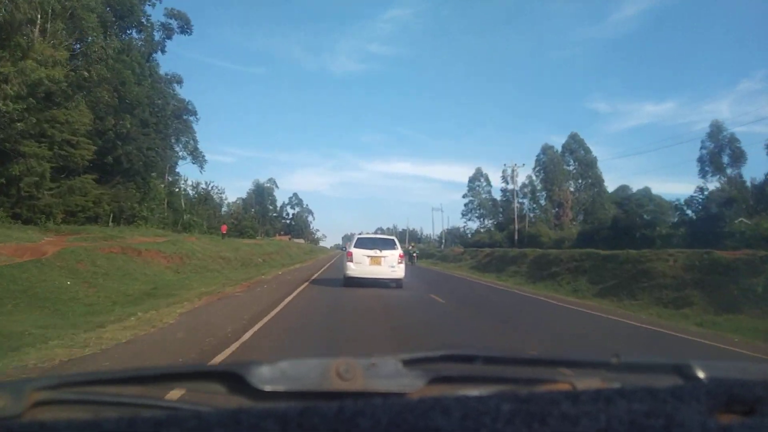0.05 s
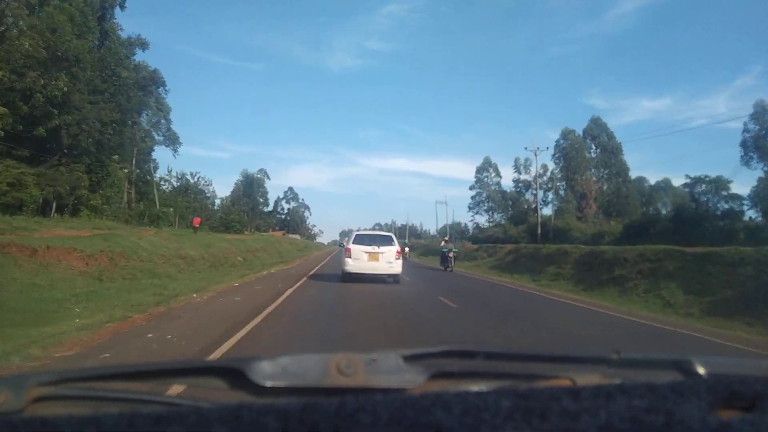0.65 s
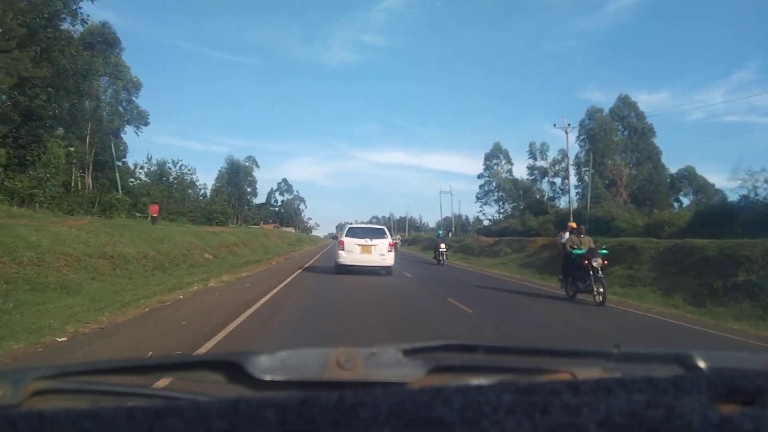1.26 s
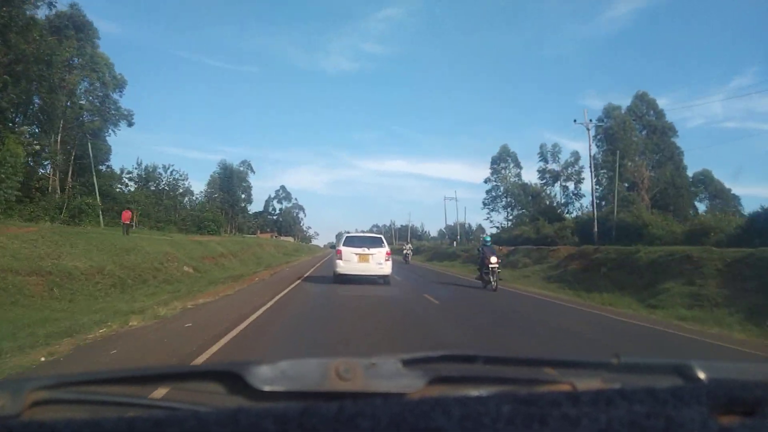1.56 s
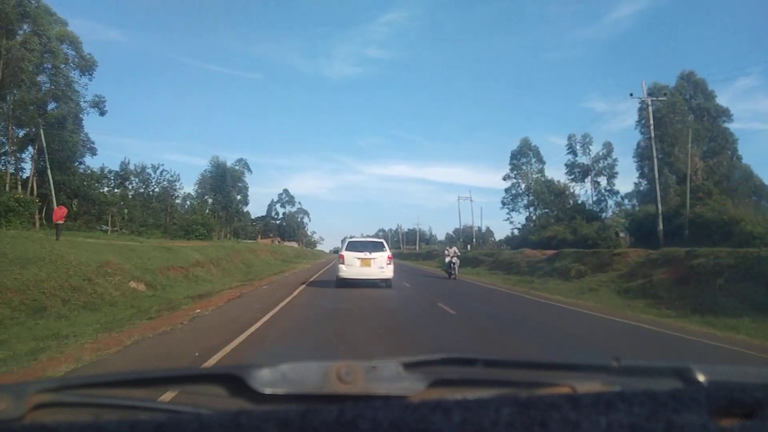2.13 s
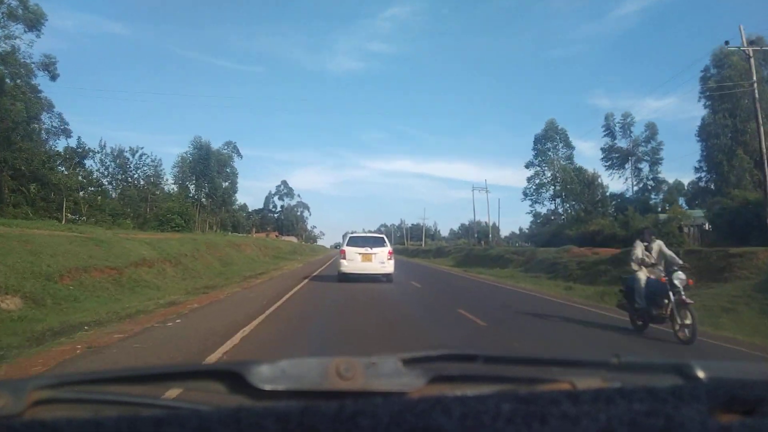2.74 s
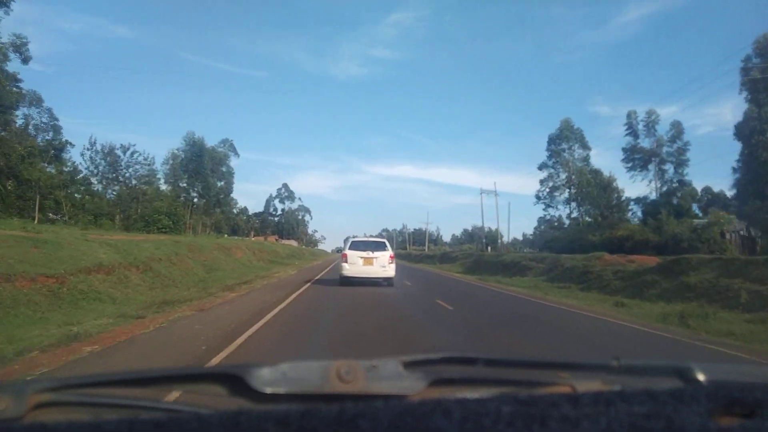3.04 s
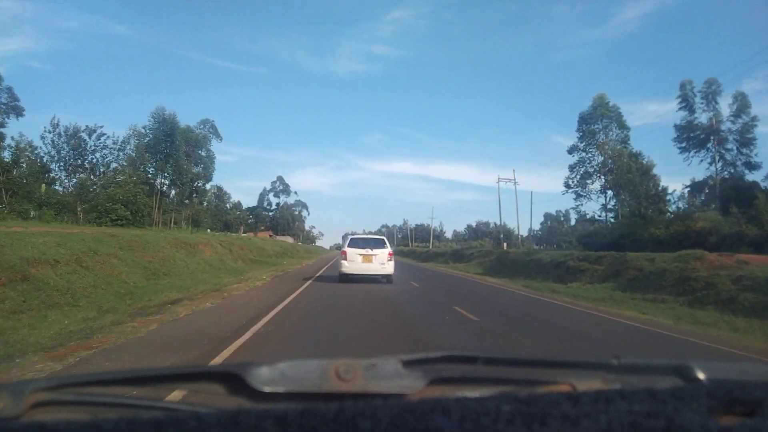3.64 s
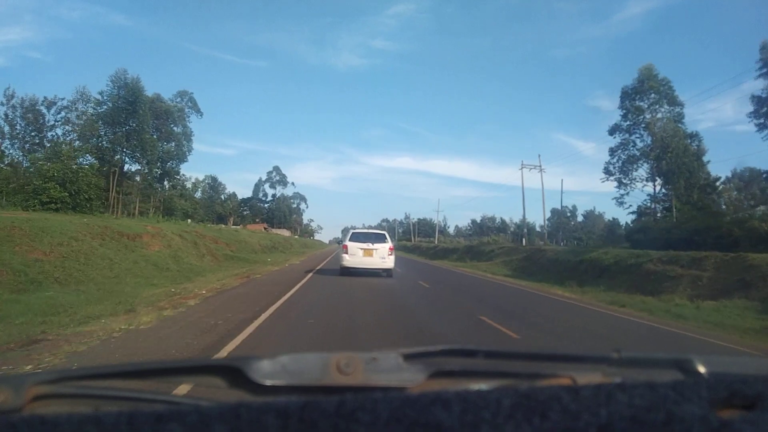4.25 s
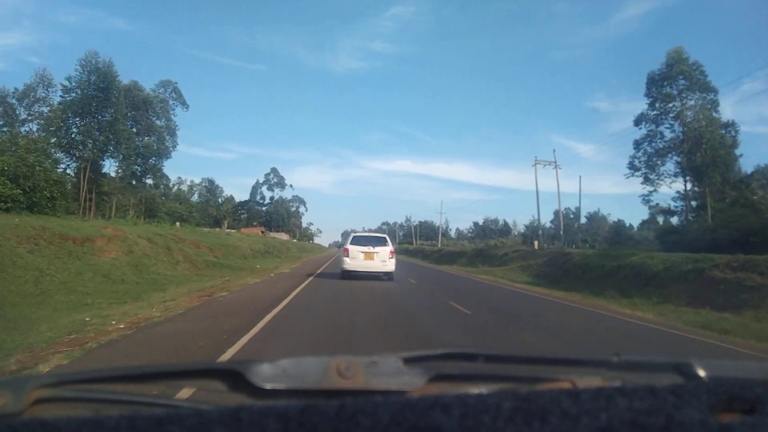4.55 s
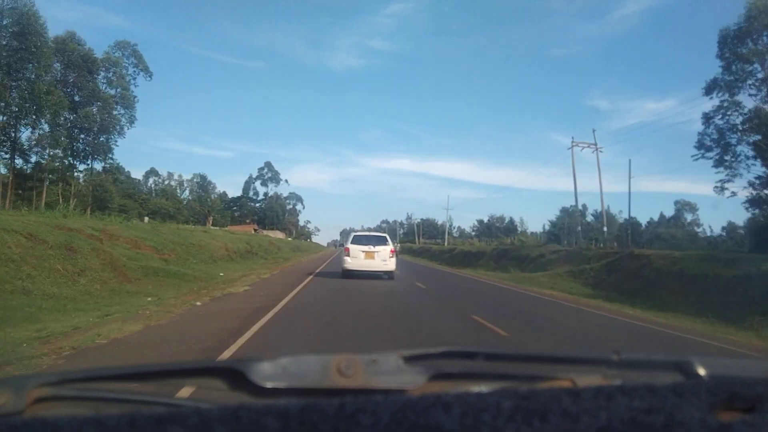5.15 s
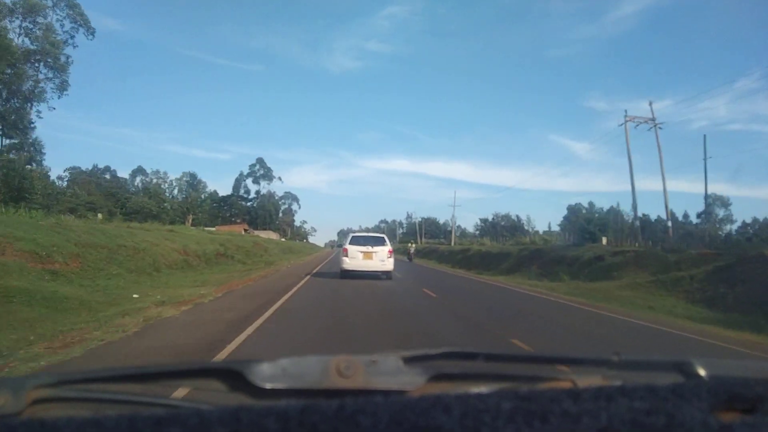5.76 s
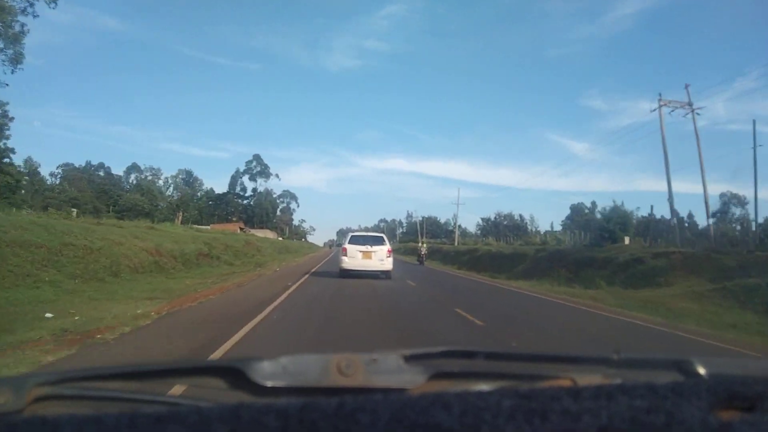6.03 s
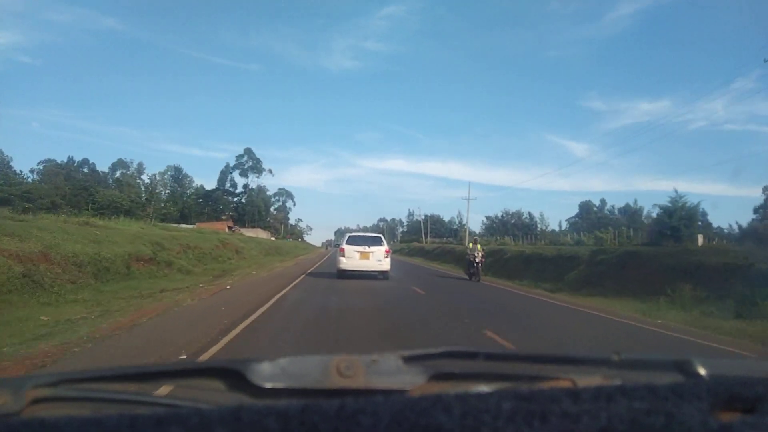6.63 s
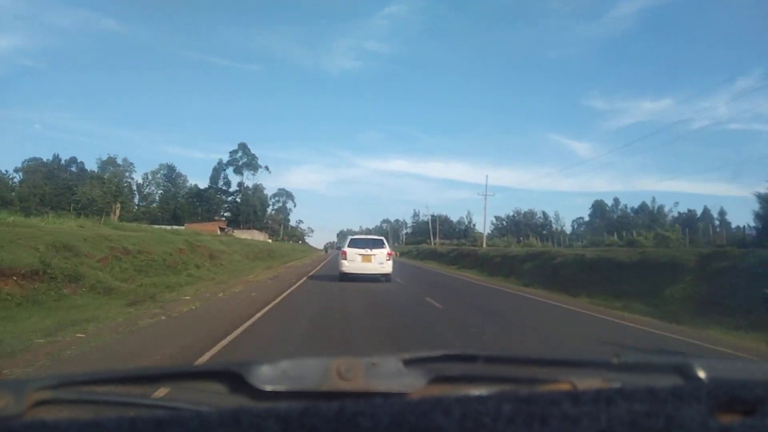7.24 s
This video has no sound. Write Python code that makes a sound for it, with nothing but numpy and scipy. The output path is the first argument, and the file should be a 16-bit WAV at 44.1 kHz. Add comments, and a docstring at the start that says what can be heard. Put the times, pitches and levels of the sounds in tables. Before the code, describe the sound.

Inside a car, tyres rumble over a humming engine while loose trim ticks and knocks and three vehicles pass the other way.

```python
"""Inside a car on coarse tarmac, very slowly gaining speed; a phone microphone behind the windscreen.
All around, the tyres shake the body and ring the panels, over a steady rush of air.
The four-cylinder engine hums beneath; close by, loose dashboard trim ticks, knocks and rasps.
Three oncoming vehicles swish past the window, dull as they approach and bright when alongside."""
import sys
import numpy as np
from scipy import signal
from scipy.fft import rfft, irfft, next_fast_len
from scipy.io import wavfile
from scipy.ndimage import uniform_filter1d

SR = 44100
rng = np.random.default_rng(int(sys.argv[2]) if len(sys.argv) > 2 else 0)


def persist_wave(psi):
    """Save psi, clipped to +-1, as 16-bit WAV."""
    counts = np.round(np.clip(psi, -1, 1) * 32767).astype(np.int16)
    wavfile.write(sys.argv[1], SR, np.atleast_2d(counts).T)


N = 325899
TIME = np.arange(N) / SR


def undb(db):
    """Decibels to gain."""
    return 10 ** (np.asarray(db) / 20)


def unit(x):
    """Scale to rms 1."""
    return x / np.sqrt(np.mean(x ** 2))


def walk(rate):
    """Smooth random drift of rms 1, changing about rate times a second."""
    size = int(SR / rate)
    held = rng.standard_normal(4096)[np.arange(N) // size]
    return unit(uniform_filter1d(uniform_filter1d(held, size), size))


def swell(s, half_s):
    """A bell-shaped rise and fall of height 1 around one moment."""
    return np.exp(-.5 * ((TIME - s) / half_s) ** 2)


def colour(x, spectrum):
    """Shape x by (f/Hz, level/dB) points and scale to rms 1."""
    hz, db = np.transpose(spectrum)
    size = next_fast_len(N)
    bins = np.maximum(np.fft.rfftfreq(size, 1 / SR), 1)
    gain = undb(np.interp(np.log(bins), np.log(hz), db))
    return unit(irfft(rfft(x, size) * gain, size)[:N])


def noise(spectrum):
    """Coloured noise of rms 1."""
    return colour(rng.standard_normal(N), spectrum)


def resonate(x, hz, width):
    """One resonance, gain 1 at its centre."""
    return signal.lfilter(*signal.iirpeak(hz, hz / width, fs=SR), x)


def band(x, hz, width):
    """A resonance applied twice for steep sides, scaled to rms 1."""
    return unit(resonate(resonate(x, hz, width), hz, width))


def ring(modes, contact_hz=11000):
    """One blow on (f/Hz, t60/s, level/dB) modes, peak 1; the finite contact time softens the top."""
    t = TIME[:SR // 20]
    y = sum(undb(db) * np.exp(-np.log(1000) * t / t60) * np.sin(2 * np.pi * hz * t)
            for hz, t60, db in modes)
    y = signal.sosfilt(signal.butter(2, contact_hz, fs=SR, output="sos"), y)
    return y / np.abs(y).max()


def blows(rows):
    """An impulse for each (t/s, level/dB) row."""
    x = np.zeros(N)
    for s, db in rows:
        x[int(s * SR)] += undb(db)
    return x


def sparks(per_s, scatter_db):
    """Impulses at random moments with scattered sizes."""
    return (rng.random(N) < per_s / SR) * undb(scatter_db * np.clip(rng.standard_normal(N), -2, 2))


def crackle(start_db=-87, db_per_s=-2.4):
    """Far in the background, loose bits in the cabin snap brightly, less as the road gets smoother."""
    snaps = band(sparks(per_s=30, scatter_db=5), hz=11200, width=8000)
    return snaps * undb(start_db + db_per_s * TIME)


# Seal chirps, barely reaching the microphone: t/s, peak level/dB, f/Hz
SEAL_CHIRPS = [(2.182, -55, 3800), (5.77, -60, 3690), (5.973, -70, 3690)]

def squeaks(half_s=0.0082, waver=0.004):
    """A seal chirps as the body flexes: a nearly pure tone that swells and fades."""
    wavering_time = np.cumsum(1 + waver * walk(50)) / SR
    return sum(undb(db) * swell(s, half_s) * np.sin(2 * np.pi * hz * wavering_time)
               for s, db, hz in SEAL_CHIRPS)


# Modes of the plastic trim: f/Hz, t60/s, relative level/dB
TRIM_MODES = [(4130, 0.0042, 2), (5230, 0.0021, 12), (5700, 0.0031, -1.5), (6700, 0.0016, -12),
              (10400, 0.0017, -1)]
# Its louder rasps, close to the microphone: t/s, level/dB, half duration/s
TRIM_RASPS = [(0.005, -47, 0.0075), (0.048, -57, 0.011), (0.133, -58, .004), (0.174, -58, .004),
              (0.234, -61, .005), (0.45, -63, 0.0044), (0.49, -60, 0.01), (0.743, -61, 0.018),
              (0.868, -62, 0.0047), (0.938, -62, 0.0064), (1.01, -63, .003), (1.058, -61, .004),
              (1.18, -63, .006), (1.218, -59, 0.0056), (1.355, -61, .004), (1.428, -59, .005),
              (1.571, -57, .004), (1.773, -62, .016), (2.205, -63, 0.024), (2.855, -59.5, .015),
              (2.915, -63, .004), (3.525, -63, .01), (3.693, -59, 0.0055), (3.72, -64, .012),
              (3.837, -64, .004), (3.99, -60, 0.0057), (4.081, -62, .009), (4.14, -62, 0.016),
              (4.58, -62, .005), (4.715, -62, .004), (4.75, -66, 0.012), (4.822, -62, .004),
              (5.159, -61, 0.0037), (5.44, -61, 0.016), (5.607, -64, 0.021), (5.808, -59, 0.0047),
              (6.056, -60, .004), (6.13, -61, 0.0065), (6.287, -55, .004), (6.348, -61, 0.0068),
              (6.41, -63, 0.0062), (6.698, -61.5, 0.0036), (6.853, -59, 0.0045), (6.902, -59, 0.0048),
              (6.939, -58.5, 0.0089), (6.982, -61, .004), (7.064, -65.5, .006), (7.123, -65, .009),
              (7.154, -60, .004), (7.18, -65, .005), (7.343, -60, .003)]

def trim_rasp(tremble_db=-71.5, tremble_db_per_s=-0.2, jolt_s=0.0039, grit_db=-17):
    """Plastic parts rub in tiny slips that ring the trim; its tremble eases as the road gets smoother."""
    slips = unit(sparks(per_s=1000, scatter_db=4.5) * rng.choice([-1, 1], N))
    ringing = unit(signal.fftconvolve(slips, ring(TRIM_MODES))[:N])
    grit = undb(grit_db) * band(slips, hz=11700, width=6500)
    jolt_energy = sparks(per_s=58, scatter_db=-1) ** 2
    jolts = signal.fftconvolve(jolt_energy, np.hanning(int(2 * jolt_s * SR)), "same")
    tremble = unit(np.sqrt(np.abs(jolts))) * undb(tremble_db + tremble_db_per_s * TIME)
    rasp_energy = sum((undb(db) * swell(s, half_s)) ** 2 for s, db, half_s in TRIM_RASPS)
    return (ringing + grit) * np.sqrt(tremble ** 2 + rasp_energy)


# Sharp ticks of the nearby trim: t/s, blow level/dB, snap level relative to the blow/dB
TRIM_TICKS = [(0.0475, -59, 3), (0.2375, -57, 9), (0.5038, -41.5, -14), (0.6502, -44.5, -8),
              (0.9345, -52, 2), (1.222, -49, -9), (1.695, -46, 1), (2.6719, -44, -9), (2.818, -40, -12),
              (3.5154, -57, -4), (3.692, -55, -11), (3.7155, -50, 1), (3.987, -50, -6), (4.0791, -53, -3),
              (4.111, -48, -1), (4.5765, -50, -2), (5.1575, -54, -5), (5.4784, -47, 1), (5.6356, -52, -13),
              (5.7208, -45, -12), (5.804, -47, 0), (6.076, -41, -11), (6.2884, -48, -2), (6.3006, -45, -14),
              (6.312, -43, -9), (6.3465, -49, -2), (6.3497, -51, 8), (6.565, -53, 6), (6.8394, -52, -6),
              (6.8505, -53, 3), (6.891, -49, -10), (6.948, -47, -8), (7.0057, -41.5, -20),
              (7.179, -47, -14)]

def trim_ticks(ring_gain_db=4, ring_hz=5450, width_hz=2800, snap_gain_db=-1.5, snap_hz=9000):
    """Hard jolts knock the trim together: a short thin ring, and a toneless snap where bare edges meet."""
    hits = [(s, db) for s, db, _ in TRIM_TICKS]
    rings = band(blows(hits), ring_hz, width_hz)
    rings *= undb(max(db for _, db in hits) + ring_gain_db) / np.abs(rings).max()
    snaps = blows([(s, db + snap_db + snap_gain_db) for s, db, snap_db in TRIM_TICKS])
    return rings + signal.sosfilt(signal.butter(2, snap_hz, "high", fs=SR, output="sos"), snaps)


# Knocks in the dashboard, close to the microphone: t/s, peak level/dB, ring f/Hz
DASHBOARD_KNOCKS = [(.249, -31.5, 3180), (1.122, -17.5, 1440)]

def knocks(t60=0.0046, body_ratio=0.73, body_db=1):
    """A loose part taps the dashboard: a short ring over a lower body mode."""
    out = 0
    for s, db, hz in DASHBOARD_KNOCKS:
        tap = ring([(hz, t60, 0), (hz * body_ratio, t60, body_db)], contact_hz=4200)
        out += signal.fftconvolve(blows([(s, db)]), tap)[:N]
    return out


# Air streaming round the cabin, heard from inside: f/Hz, relative level/dB
AIR_SPECTRUM = [(300, -11.5), (900, 6.5), (1400, -3), (1650, -2), (1950, -10.5), (2700, -26), (3300, -28),
                (4000, -26.5), (6200, -34.5), (7500, -41), (8300, -50.5), (12000, -57.5), (15500, -64.5)]

def air(level_db=-44):
    """Steady airflow over the windscreen and door seals."""
    return noise(AIR_SPECTRUM) * undb(level_db)


# Oncoming vehicles, a lane away: alongside t/s, swish level/dB, swish half duration/s,
# hiss level relative to the swish/dB, hiss lag/s, hiss half duration/s
ONCOMING = [(1.891, -38, 0.1, -15.5, 0.041, .058), (2.363, -33.5, 0.088, -10, 0.0061, 0.045),
            (3.258, -35, 0.079, -16.5, 0.013, 0.048)]
# Their tyre noise through the window: f/Hz, relative level/dB
SWISH_SPECTRUM = [(500, -11), (1300, 13), (1750, 3), (2150, -1.5), (2400, -4), (2800, -9), (3200, -18),
                  (3500, -13.5), (3900, -20.5), (4500, -27.5), (6000, -26), (8000, -46.5)]
# The hiss that only gets in from alongside: f/Hz, relative level/dB
HISS_SPECTRUM = [(2000, 13), (3600, 14.5), (4600, 3.5), (6200, 2.5), (7800, -8), (10000, -1.5), (12300, -3),
                 (15500, -28)]

def traffic(lead_s=0.032, beam=1.4, shadow=0.45, sing_db=-34, trailing_hiss_db=-28, flutter_db=1.6):
    """Tyres sing from far ahead, swish and hiss grittily alongside, then a brief high hiss trails behind."""
    swish, hiss, sing, trailing_hiss = 0, 0, 0, 0
    for s, db, half_s, hiss_db, lag_s, hiss_half_s in ONCOMING:
        falloff = 1 + shadow * (TIME > s)  # the sound dies faster once behind the car
        swish += undb(db) / (1 + ((TIME - s + lead_s) / half_s) ** 2) ** falloff
        hiss += undb(db + hiss_db) / (1 + ((TIME - s - lag_s) / hiss_half_s) ** 2) ** (falloff * beam / 2)
        sing += undb(db + sing_db) * swell(s - 0.11, half_s=0.31)
        trailing_hiss += undb(db + trailing_hiss_db) * swell(s + 0.069, half_s=0.045)
    tread = band(rng.standard_normal(N), hz=4200, width=800)
    high_band = band(rng.standard_normal(N), hz=5100, width=2400)
    grains = sparks(per_s=5000, scatter_db=4) * rng.choice([-1, 1], N)
    grit = colour(grains, HISS_SPECTRUM)
    passes = swish * noise(SWISH_SPECTRUM) + hiss * grit + sing * tread + trailing_hiss * high_band
    return passes * undb(flutter_db * walk(220))


# Engine and drivetrain tones: multiples of the firing rate
ENGINE_ORDERS = [1, 4, 7, 8, 8.15, 8.5]
# The body resonance that carries each into the cabin: rms level at its centre/dB, f/Hz, width/Hz
BODY_RESONANCES = [(-30, 80.3, 4.2), (-36.5, 321, 12), (-47.5, 538, 11), (-47, 639, 14), (-43.5, 664, 16),
                   (-42.5, 660, 20)]

def engine(start_hz=76.8, climb_hz_per_s=0.73, waver_db=1.5, slip_rad=0.07):
    """Firing tone and drivetrain whines, each swelling as it climbs through a body resonance."""
    firing_hz = start_hz + climb_hz_per_s * TIME
    phase = 2 * np.pi * np.cumsum(firing_hz) / SR + slip_rad * walk(2.3)
    tones = 0
    for order, (db, centre_hz, width) in zip(ENGINE_ORDERS, BODY_RESONANCES):
        depth_db = waver_db if order == 1 else 0  # the firing tone wavers as the mounts flex
        detuning = 2 * (order * firing_hz - centre_hz) / width
        gain = undb(db + depth_db * walk(3.156)) / np.hypot(1, detuning)
        tones += gain * np.sin(order * phase + rng.uniform(0, 2 * np.pi))
    return np.sqrt(2) * tones


# Road roar through the body shell, all round the microphone: f/Hz, relative level/dB
ROAR_SPECTRUM = [(20, -28.5), (34, -20), (47, -17), (58, -7), (72, -0.5), (100, 3.5), (150, 1.5),
                 (215, -1.5), (242, -5), (265, 0), (315, -6), (355, -9.5), (480, -12), (850, -35),
                 (2000, -77.5)]
# Rise and fall of the roar's bass: t/s, relative level/dB
BASS_CURVE = [(0, 0), (1.8, -1), (2.3, 2), (5.5, 0), (6.9, 3), (7.39, 1.5)]
# Tyre and panel resonances: f/Hz, width/Hz, rms level/dB
PANEL_MODES = [(203.5, 8.5, -33), (314.7, 22, -35.5), (403.6, 9.3, -41), (550.5, 11, -47.5), (607, 42, -43),
               (668, 28, -44.5), (767, 55, -46), (955, 82, -48.5), (1072, 92, -41.5), (1275, 62.5, -42),
               (1468.5, 69, -48), (2080, 66, -67.5), (2506, 380, -62)]

def road(roar_db=-22, patchy_db=0.22, panel_waver_db=0.54, bass_hz=115):
    """Coarse tarmac drives a broad roar and rings the tyres and panels, unevenly from patch to patch."""
    roar = noise(ROAR_SPECTRUM) * undb(roar_db - patchy_db * walk(1.6))
    bass = signal.sosfiltfilt(signal.butter(3, bass_hz, fs=SR, output="sos"), roar)
    bass_gain = undb(np.interp(TIME, *np.transpose(BASS_CURVE)))
    panels = 0
    for hz, width, db in PANEL_MODES:
        drive = resonate(rng.standard_normal(N), hz, 4 * width)  # padding damps all but the resonance
        panels += unit(resonate(drive, hz, width)) * undb(db + panel_waver_db * walk(5.3))
    return roar + bass * (bass_gain - 1) + panels


def scene():
    """The cabin in mono, from one microphone behind the windscreen."""
    driving = engine() + road() + air() + traffic()
    rattles = trim_rasp() + trim_ticks() + crackle() + knocks() + squeaks()
    return (driving + rattles)[None]


def record(dry, top_hz=15400):
    """The phone cuts the top of the treble steeply."""
    return signal.sosfilt(signal.ellip(8, .2, 70, top_hz, fs=SR, output="sos"), dry)


dry = scene()
out = record(dry)
persist_wave(out)
```